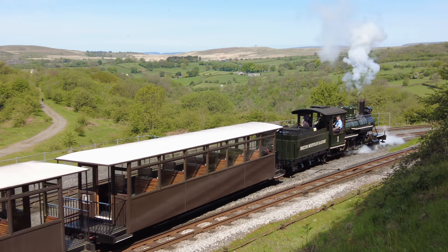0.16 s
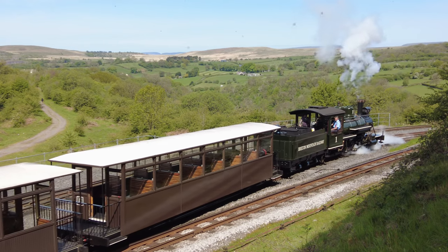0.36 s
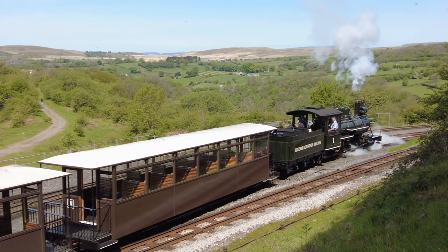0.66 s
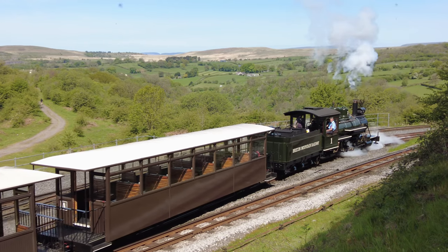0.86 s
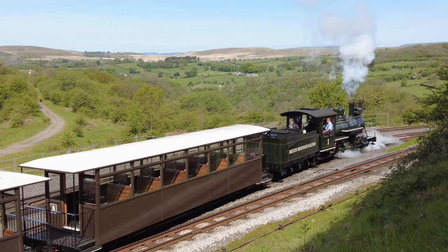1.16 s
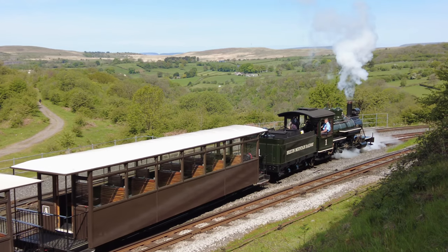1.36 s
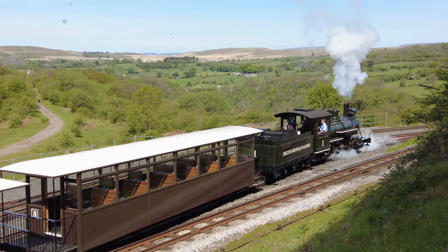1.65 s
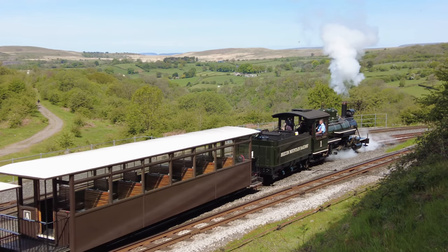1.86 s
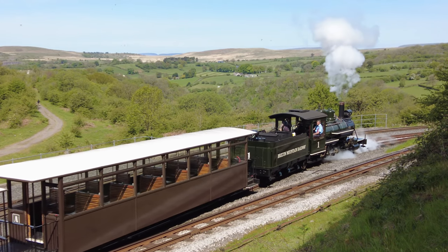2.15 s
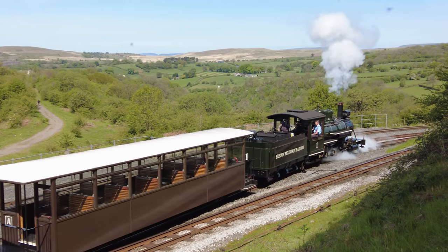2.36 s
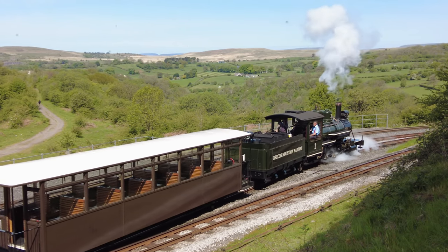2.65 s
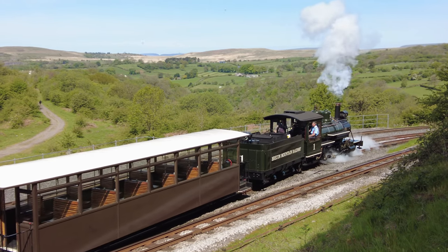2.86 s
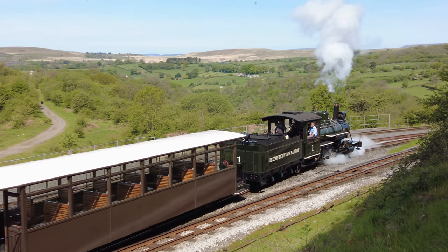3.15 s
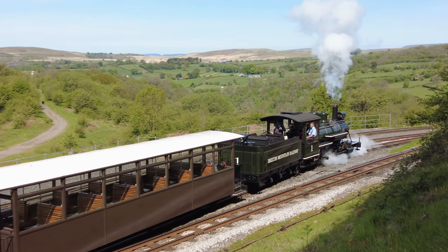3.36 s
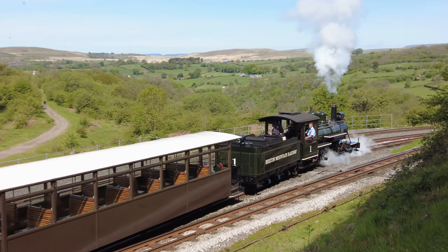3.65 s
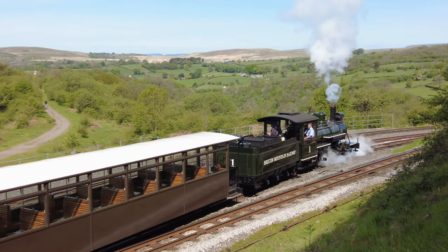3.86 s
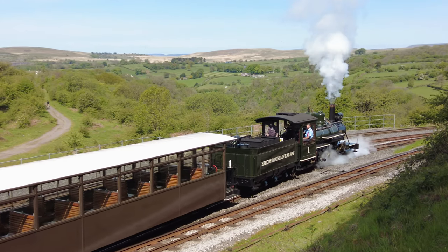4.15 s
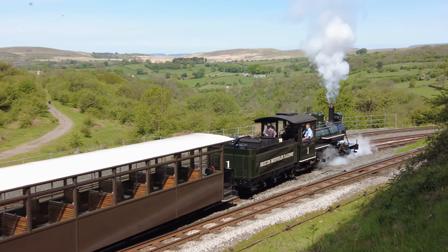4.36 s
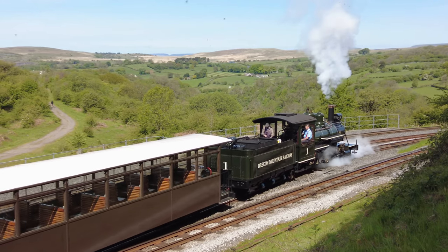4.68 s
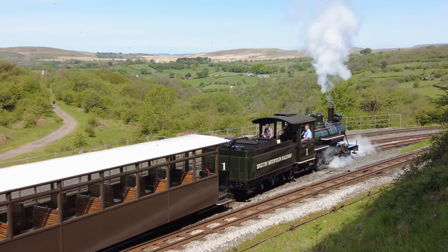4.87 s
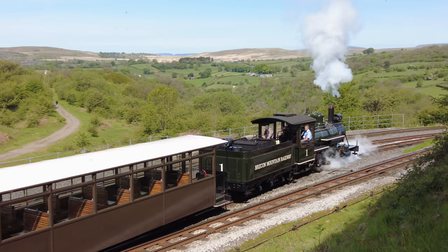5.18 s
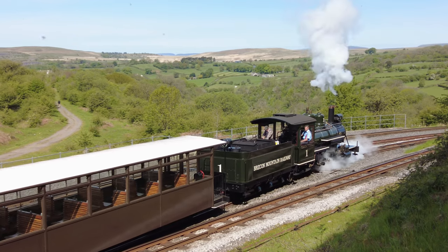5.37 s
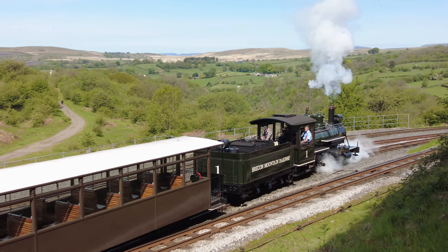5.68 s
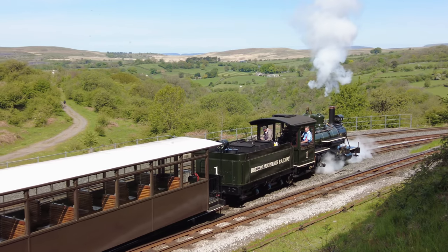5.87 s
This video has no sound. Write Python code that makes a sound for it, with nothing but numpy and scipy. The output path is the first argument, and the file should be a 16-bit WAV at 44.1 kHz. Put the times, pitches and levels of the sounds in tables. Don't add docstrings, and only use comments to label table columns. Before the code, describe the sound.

A steam locomotive works slowly through open country, heard by a stereo microphone outdoors. Hollow, roaring exhaust beats fall near 0.1, 0.65, 1.2, 1.8, 2.4, 2.95, 3.5, 4.05, 4.65, 5.2 and 5.7 seconds, each swelling and fading softly; the one at 3.5 is hardest, and the last two ease off. Hillsides answer faintly. Steam hiss fills the gaps: a strong jet from 0.15 to 1.25, weaker until 2.45, strong again to 3.5, then thin and fizzy, growing from 4.7 and quickly fading after 5.75. Short wet spits occur near 0.5, 2.9 and 5.65. Carriages rumble and the rails hum toward the left, with dull knocks around 0.2-0.35, 1.3-1.4, 2.2, 3.4, 4.2 and 5.6. A brief steel clink rings at 2.2. Light wind buffets low throughout, and the beats continue to the end at 6 seconds.

```python
import sys
import numpy as np
from scipy import signal
from scipy.fft import rfft, irfft, next_fast_len
from scipy.io import wavfile
from scipy.ndimage import uniform_filter1d, map_coordinates

SR = 44100
rng = np.random.default_rng(int(sys.argv[2]) if len(sys.argv) > 2 else 0)


def store_wav(level_fs):
    pcm = np.round(np.clip(np.atleast_2d(level_fs), -1, 1) * 32767)
    wavfile.write(sys.argv[1], SR, pcm.T.astype(np.int16))


def volts_from_decibels(level):
    exponent = np.asarray(level, float) / 20
    return 10 ** exponent


N = 265482
TIME = np.arange(N) / SR


def unit(x):
    return x / np.sqrt(np.mean(x ** 2) + 1e-20)


def along(points, hz):
    f, value = np.transpose(points)
    return np.interp(np.log(hz + 1), np.log(f + 1), value)


def level_curve(points):
    s, db = np.transpose(points)
    return np.interp(TIME, s, db)


def bump(s, width):
    return np.exp(-np.minimum(((TIME - s) / width) ** 2, 20))


def wobble(rate):
    knots = rng.standard_normal(int(N * rate / SR) + 4)
    return map_coordinates(knots, [TIME * rate])


def filtered(x, response):
    m = next_fast_len(N + SR // 2)
    return irfft(rfft(x, m) * response(np.fft.rfftfreq(m, 1 / SR)), m)[..., :N]


def coloured(noise, curve):
    return unit(filtered(noise, lambda hz: volts_from_decibels(along(curve, hz))))


def patchy(patchy_db):
    z = signal.stft(rng.standard_normal((2, N)), nperseg=512)[2]
    field = rng.standard_normal(z.shape[1:])
    field = uniform_filter1d(uniform_filter1d(field, 6, 0), 10, 1)
    return signal.istft(z * volts_from_decibels(patchy_db * unit(field)), nperseg=512)[1][:, :N]


def ports(pair, alike, lead_us, pan=((1, 0),)):
    m = next_fast_len(N + 4096)
    hz = np.fft.rfftfreq(m, 1 / SR)
    turn = np.arccos(np.clip(along(alike, hz), -1, 1)) / 2
    shared, own = rfft(pair, m) * [np.cos(turn), np.sin(turn)]
    left = np.exp(-1j * np.pi * hz * along(lead_us, hz) / 1130000.0) * volts_from_decibels(along(pan, hz) / 2)
    return irfft([(shared + own) * left, (shared - own) / left], m)[:, :N]


# peak t/s, level/dB, fall t/s, roar over the pipe level/dB
BEATS = [(.078, -22, .074, -5.5), (.645, -22, .058, -4.5), (1.2, -22, .058, -7.5),
         (1.79, -21.5, .066, -7.5), (2.39, -19.5, .082, -6.5), (2.944, -20, .07, -7.5),
         (3.487, -17.5, .062, -11.5), (4.064, -20.5, .065, -9.5), (4.646, -19.2, .09, -9.5),
         (5.19, -21.8, .078, -5.5), (5.72, -22, .074, -7)]


def puffs(early_s, shrink, tilted):
    rise_s, usual_db, sharper_per_db = .051, -21, .21
    flow = np.zeros(N)
    for s, db, fall_s, roar_db in BEATS:
        t = TIME - s + early_s
        square = np.clip(2.1 - sharper_per_db * (db - usual_db), 1, 3)
        away = np.abs(t / (shrink * np.where(t < 0, rise_s, fall_s))) ** square
        flow += volts_from_decibels(db + tilted * roar_db - 26.3 * away)
    return flow


PIPE_HZ = 157
# multiple of PIPE_HZ, width f/Hz, level/dB
PIPE_MODES = [(1, 42, -15), (2, 51, -9), (3, 48, -0.5), (4, 74, -1.5), (5, 72, -2.5), (6, 120, -7.5),
              (7, 54, -6.5), (8, 125, -9)]


def pipe(f):
    total = 0
    for k, width, db in PIPE_MODES:
        damping = 1j * f * width
        total = total + (-1) ** k * volts_from_decibels(db) * damping / ((k * PIPE_HZ) ** 2 - f * f + damping)
    return total / (1 + 1j * f / 1500) ** 2


# f/Hz, level/dB per Hz
MOUTH_ROAR = [(600, -30), (1000, -1), (1300, -1), (1550, -2), (1850, -0.5), (2100, -2.5), (2400, -0.5),
              (3200, -9.5), (5000, -10), (9000, -52)]
# f/Hz, lead of the right port/microseconds
BLAST_LEAD = [(200, 110), (700, 186), (1000, 140), (1500, 20), (2400, 59)]


def chimney():
    white = rng.standard_normal((2, 2, N))
    eddies = volts_from_decibels(0.94 * wobble(70))
    flow = puffs(0.0081, 1.027, tilted=False)
    tone = filtered(white[0] * eddies * flow, pipe) / np.std(filtered(white[0], pipe))
    roar = coloured(white[1], MOUTH_ROAR) * puffs(0.01, 0.91, tilted=True)
    blast = tone + roar
    t = np.arange(SR // 2) / SR
    tail = rng.standard_normal((2, len(t))) * volts_from_decibels(-60 * t / 0.63) * (t > .03)
    echo = signal.fftconvolve(blast, tail / np.linalg.norm(tail[0]), axes=1)[:, :N]
    return ports(blast, [(500, 1.0), (1100, 1.0), (3000, 0.93)], BLAST_LEAD) + volts_from_decibels(-19.5) * echo


# valve opens t/s, flow level/dB, filling t/s, drift dB/s, fizz over the flow level/dB
STROKES = [
    (-1, -42, .03, 0.1, -3),
    (.14, -28, .135, 1.5, -8.5),
    (1.25, -33.5, .015, -1.5, -8),
    (2.45, -28, .18, .5, -6.5),
    (3.53, -36, .05, -2.5, -.5),
    (4.7, -36, .015, 9, -2.5),
    (5.765, -33.5, .012, -12, -3.5),
    (7, -34, .03, .1, -3),
]
# t/s, level/dB, half width t/s
SPURTS = [
    (.47, 3, .045),
    (1.8, 1.5, .15),
    (2.88, 2.5, .04),
    (3.23, 1.5, .05),
    (3.41, -3.5, .06),
    (4.06, 2, .12),
    (5.65, 2.5, .035),
]


def strokes(shut_db, slower, fizzy):
    fade_s = .04
    s, db, fill, drift, fizz = np.transpose(STROKES)
    k = np.searchsorted(s, TIME, side="right") - 1
    since, until = TIME - s[k], s[k + 1] - TIME
    hiccup = -2 * np.exp(-((since - .37) / .03) ** 2)
    full = db[k] + fizzy * fizz[k] + drift[k] * since + hiccup
    full += sum(spurt_db * bump(at, width) for at, spurt_db, width in SPURTS)
    filling = 1 - np.exp(-since / (slower * fill[k]))
    fading = 1 - np.exp(-until / (slower * fade_s))
    return shut_db + (full - shut_db) * filling * fading


# f/Hz, level/dB per Hz
STEAM = [(600, -31), (1000, -16.5), (1200, -12), (1700, -7.5), (2500, -5), (3500, -4), (4800, -1),
         (6500, -3), (8200, -6), (10000, -8), (12000, -15), (14400, -16.5)]
# f/Hz, width f/Hz, level/dB
COMB = [(1084, 140, 0), (1283, 103, 7), (1925, 130, 5.5), (2114, 100, -6.5), (2700, 134, 4),
        (3058, 88, 6.5), (4300, 350, 5.5), (6230, 940, 4), (7680, 780, 6), (9150, 640, 2.5),
        (10820, 600, 3)]


def steam_colour(hz):
    comb_db = sum(db / (1 + (2 * (hz - centre) / width) ** 2) for centre, width, db in COMB)
    return volts_from_decibels(along(STEAM, hz) + comb_db)


# t/s, level/dB
LEAK = [(0, -38), (.3, -36.5), (.8, -35), (1.4, -39.5), (2.35, -38.5), (2.55, -35.5), (3.3, -36.5),
        (3.65, -39), (4.5, -35.5), (4.8, -32), (5.65, -32.5), (6.02, -36)]
# f/Hz, likeness 0-1
JET_ALIKE = [(1600, .95), (3000, .86), (3350, .52), (4300, .85), (4900, .33), (6300, .53), (7100, .33),
             (7800, .62), (8600, .25), (9350, .68), (10200, .3), (10700, .65), (12000, .4), (14000, .25)]
# f/Hz, lead of the right port/microseconds
JET_LEAD = [(2000, 11), (3500, 46), (4500, 32), (5600, 26), (6500, 61), (8000, 16.5), (9400, 41),
            (10200, 38), (12500, 46)]
# f/Hz, left minus right level/dB
JET_PAN = [(1200, 0.5), (3000, 0), (4300, -2.5), (6200, 1), (7500, -3.5), (9000, 0), (14000, -5)]


def jets():
    body_db = strokes(-45, 1, fizzy=False)
    fizz_db = strokes(-49, 1.6, fizzy=True)
    low_db = level_curve(LEAK)
    choke_db = -7.5 * sum(bump(stroke[0], .025) for stroke in STROKES)

    def above(hz, edge_hz):
        return 1 / (1 + (edge_hz / (hz + 1)) ** 8)

    def hiss(share):
        return unit(filtered(noise, lambda hz: steam_colour(hz) * np.sqrt(share(hz))))

    noise, gust_db = patchy(1.8), 0.65 * wobble(9)
    low = hiss(lambda hz: 1 - above(hz, 3590))
    body = hiss(lambda hz: above(hz, 3650) * (1 - above(hz, 5960)))
    fizz = hiss(lambda hz: above(hz, 9270))
    steam = low * volts_from_decibels(low_db + 1.0 + 0.69 * choke_db)
    steam += body * volts_from_decibels(body_db - 2.4 + 0.32 * choke_db)
    steam += fizz * volts_from_decibels(fizz_db + 3.5 + 0.37 * choke_db + 0.61 * wobble(15))
    return ports(steam * volts_from_decibels(gust_db), JET_ALIKE, JET_LEAD, pan=JET_PAN)


# f/Hz, level/dB per Hz
WHEEL_COLOUR = [(60, -34), (110, 1), (160, -3.5), (250, -9.5), (400, -14), (700, -37)]
# t/s, level/dB
ROLLING = [(0, -56), (.35, -48), (.9, -54), (1.4, -50), (1.9, -51), (2.4, -47), (3.1, -46.5), (3.7, -47),
           (4.7, -42.5), (4.9, -51), (6.02, -48)]
# f/Hz, level/dB per Hz
RAILS = [(150, -36), (260, -6.5), (500, -3), (900, -3.5), (1200, -8.5), (1800, -44)]
# t/s, level/dB, centre f/Hz, t60 t/s
KNOCKS = [(.205, -28.5, 480, .1), (.295, -32.5, 414, 0.2), (0.344, -25, 200, .05), (1.305, -28, 750, 0.13),
          (1.391, -26, 190, 0.081), (1.95, -43, 300, .06), (2.21, -28, 650, .08), (3.19, -42, 495, .08),
          (3.365, -33, 600, 0.21), (3.96, -45, 500, .1), (4.199, -35, 500, 0.19), (4.245, -30, 260, 0.046),
          (4.401, -36, 400, 0.056), (5.6, -26.5, 600, 0.094), (5.83, -37, 500, 0.09)]


def carriages():
    tug_db = 3 * sum(bump(beat[0] + .03, .06) for beat in BEATS)
    rumble_db = level_curve(ROLLING) + tug_db + 3.5 + 1.1 * wobble(14)
    sound = coloured(patchy(3.0), WHEEL_COLOUR) * volts_from_decibels(rumble_db)
    sound += coloured(patchy(1.2), RAILS) * volts_from_decibels(-46.5 + 0.43 * wobble(5))
    t = np.arange(SR // 4) / SR
    for s, db, hz, t60 in KNOCKS:
        white = rng.standard_normal((2, len(t)))
        band = signal.butter(2, [0.53 * hz, 1.6 * hz], "band", fs=SR, output="sos")
        thud = unit(signal.sosfilt(band, white))
        knock = thud * volts_from_decibels(db - 60 * t / t60) * (1 - np.exp(-t / 0.0047))
        start = round(s * SR)
        sound[:, start:start + len(t)] += knock[:, :N - start]
    return ports(sound, [(100, .97), (400, .85), (900, .8)], [(500, -420)])


# f/Hz, level/dB, t60 t/s
ROD_MODES = [
    (1272, 0, .075),
    (1712, -11, .06),
    (1895, -10, .045),
]


def rod():
    clink_s, clink_db, scrape_s = 2.209, -25, .02
    t = np.clip(TIME - clink_s, 0, None)
    after = np.clip(t - scrape_s, 0, None)
    ring = np.zeros(N)
    for hz, db, t60 in ROD_MODES:
        level = volts_from_decibels(db - 60 * after / t60 + 1.5 * wobble(70))
        ring += level * np.sin(2 * np.pi * hz * t + .7 * wobble(110))
    return volts_from_decibels(clink_db) * ring * (1 - np.exp(-t / 0.0066))


# f/Hz, level/dB per Hz
BUFFET = [(11, -27), (18, 1.5), (49, 6.5), (220, -17), (290, -36), (480, -120)]
# t/s, peak level/dB, half width t/s
GUSTS = [(.12, -35, .04), (.23, -35, .04), (.4, -32, .04), (.62, -40, .08), (1.16, -37, .03),
         (1.4, -36, .13), (1.74, -37, .04), (1.86, -38, .04), (2.03, -36, .08), (2.27, -31, .06),
         (2.41, -34, .08), (2.68, -46, .07), (2.93, -41, .07), (3.32, -39, .025), (3.44, -36, .03),
         (3.58, -39, .03), (3.7, -38, .04), (3.88, -43, .04), (4.02, -37, .07), (4.29, -35, .035),
         (4.51, -36, .04), (4.68, -37, .06), (4.87, -44, .06), (5.22, -35, .1), (5.47, -37, .04),
         (5.67, -32, .05), (5.97, -45, .03)]


def wind():
    low = filtered(rng.standard_normal((2, N)), lambda hz: volts_from_decibels(along(BUFFET, hz)))
    even = low / np.abs(uniform_filter1d(low ** 2, size=SR // 14, axis=1)) ** 0.37
    calm_db = -43.5
    strength = volts_from_decibels(calm_db) + sum(volts_from_decibels(db + 1.1) * bump(s, width) for s, db, width in GUSTS)
    return ports(unit(even) * strength, [(30, 0.99), (150, 1.0)], [(50, 5)], pan=[(30, -3.5), (90, 0.2)])


def scene():
    return chimney() + jets() + carriages() + rod() + wind()


def top_cut(x):
    return signal.sosfilt(signal.butter(12, 15260, fs=SR, output="sos"), x)


def record(dry):
    top_hz = 14460
    soft = dry / (1 + np.abs(dry / 0.5) ** 4.6) ** (1 / 4.0)
    mix = filtered(soft, lambda hz: hz < top_hz)
    return top_cut(mix)


dry = scene()
out = record(dry)
store_wav(out)
```